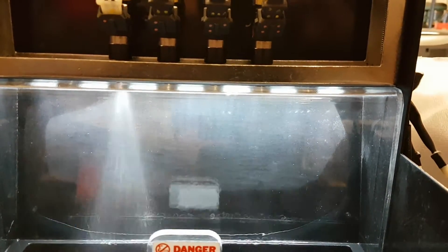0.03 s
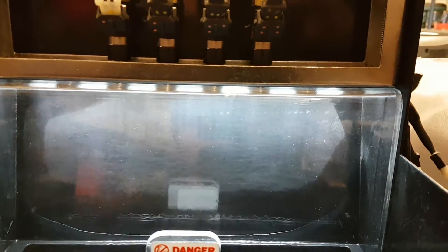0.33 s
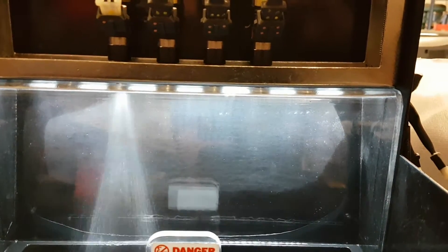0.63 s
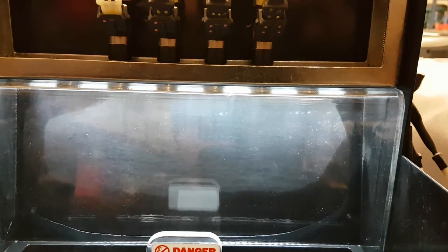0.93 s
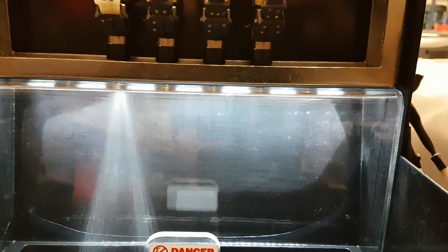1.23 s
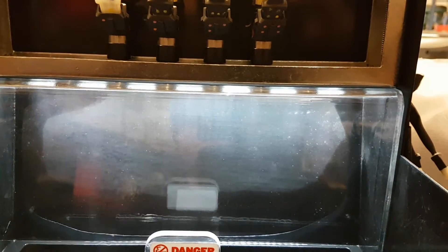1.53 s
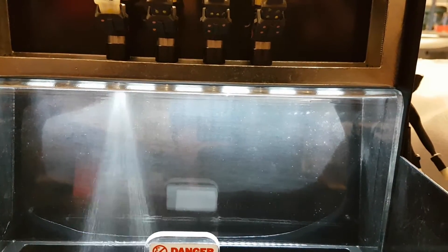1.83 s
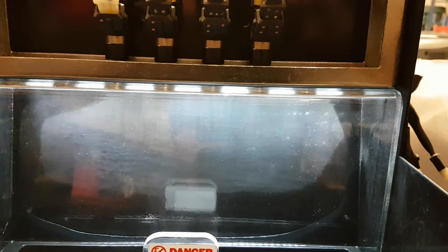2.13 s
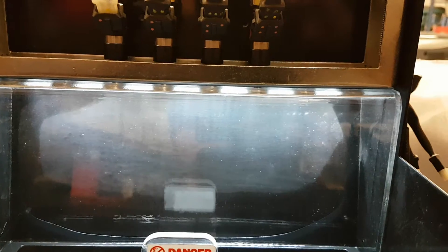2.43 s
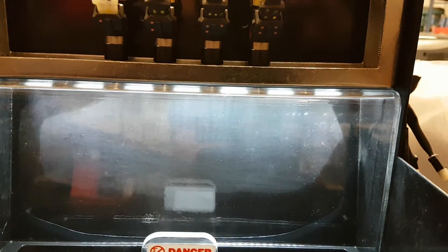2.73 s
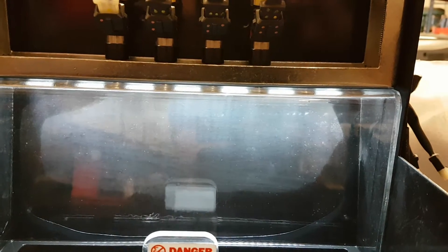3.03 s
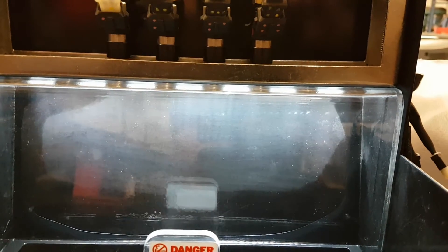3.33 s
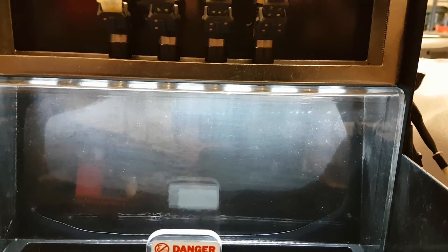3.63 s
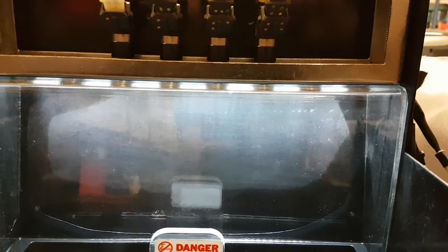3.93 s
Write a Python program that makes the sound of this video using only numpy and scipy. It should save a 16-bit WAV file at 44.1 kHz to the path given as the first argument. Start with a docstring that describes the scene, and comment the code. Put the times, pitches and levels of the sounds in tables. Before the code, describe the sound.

Sharp metallic clicking of fuel injectors firing, with a pump whining and fluid rushing beneath.

```python
"""Fuel injectors on a test bench

Two injectors fire in turn into a spray chamber, the first at 20 and then 5 shots a second, the second
at 5. Each shot is two impacts that set metal ringing: the needle opens, then snaps shut. Beneath, the
pump whines and throbs once per turn, fluid rushes, and a rumble swells on the microphone at the end."""
import sys
import numpy as np
from scipy import signal
from scipy.fft import rfft, irfft
from scipy.io import wavfile
from scipy.ndimage import uniform_filter1d

SR = 44100
rng = np.random.default_rng(int(sys.argv[2]) if len(sys.argv) > 2 else 0)


def put_to_file(sound):
    """Save the sound as 16-bit audio at rate SR, in the file named by the first command-line argument."""
    columns = np.atleast_2d(sound).T  # one column per channel
    safe = np.clip(columns, -1, 1)
    whole_steps = np.round(safe * 32767)
    wavfile.write(sys.argv[1], SR, whole_steps.astype(np.int16))


N = 176400

# runs of shots: start_s, period_s, shot_count, injector_index, needle_open_s, tick_gain_db
SHOT_RUNS = [(.0075, .0502, 7, 0, .0055, 1.3), (.5099, .20075, 8, 0, .0052, -.4),
             (2.1665, .20088, 10, 1, .0053, 0)]
# spectral envelopes of the ticks: frequency_hz, open_left_db, open_right_db, close_left_db, close_right_db
FIRST_COLOUR = [(776, -2, 2, -12, 5), (820, 14, 9, 23, -6.5), (1160, 11, 21, 3, 14), (1460, -6, 0, 6.5, 10),
                (1810, -1, 13, 14, 7), (2000, 2, 13.5, 11, 9), (2790, -6, 3, 12.5, 11.5),
                (3780, -2, -10, -4.5, 7.5), (4120, -3, 7, -0.5, 8), (5830, -13, -7.5, 3, -1),
                (6360, 2.5, 14, -3.5, 4), (7530, -3.5, -1, 4, 7), (9400, -4.5, -15, -3.5, -6),
                (11000, 1.5, -7, 2, -6), (13000, -2, -5, 2.5, -6), (14200, 11, 2, 2, 0),
                (15400, -2, 6, -16, 4)]
SECOND_COLOUR = [(770, -6, 1, 8, -2), (890, -7, 5, 5, 21.5), (1200, -10, 5, 14, 6.5), (1470, 1, 9, 11, 19),
                 (1750, 4, 15, 5, 11), (2080, -4, -1.5, 24, 10.5), (2750, -2, 4, -22, 9),
                 (3420, 5, 2, 14.5, 10.5), (3350, -22, -9, 0, -8), (3760, -11, 5, 8.5, 11.5),
                 (4750, -6, 7, 5.5, 4), (5800, -1, 5.5, 0, -2), (7150, 0, 6, 2.5, 8.5),
                 (9800, -4, -3, -2.5, -8.5), (11500, 2, -17, -1, -18), (13100, 5, 8, 4, 4),
                 (15500, 3, -14, -6, -23)]
# decay and strength of the ticks, a row per injector: open_t60_s, close_t60_s, open_db, close_db
TICK_SHAPES = [(.022, 0.041, 0.3, -1), (.026, 0.046, 0.1, -0.5)]
# modes struck as the needle closes: pitch_hz, left_db, right_db, t60_s
FIRST_CLACK = [(890, -31, -19, .036), (1070, -31, -20, .024), (2050, -27, -12, .022),
               (2600, -34, -20, .018), (3200, -35, -35, .03), (4020, -42, -33, .025),
               (7200, -35, -35, .022), (14200, -34, -34, .018)]
SECOND_CLACK = [(880, -48, -39, .05), (1720, -28, -18, .015), (2160, -24, -11, .012),
                (3270, -39, -42, .025), (3960, -35, -32, .028), (4774, -42, -30, .028),
                (7350, -37, -32, .022), (13400, -34, -35, .018)]
# modes of the spray chamber: pitch_hz, level_db, t60_s
KNOCK_MODES = [(163, -52.5, 0.15), (233.2, -32.5, 0.11), (255, -34.5, 0.046)]
# envelope of the pump's whine: time_s, level_db
WHINE_ENVELOPE = [(0.0, -25), (0.09, -31), (0.13, -24.5), (0.24, -27), (0.42, -24), (0.58, -27.5),
                  (0.8, -24), (0.92, -25.5), (1.27, -23), (1.39, -28), (1.59, -25.5), (1.7, -29),
                  (1.9, -25.5), (2.06, -26.5), (2.12, -23.5), (2.43, -31.5), (2.55, -24), (3.19, -27),
                  (3.34, -23.5), (3.44, -25), (3.54, -22.5), (3.61, -25.5), (3.87, -27), (4.0, -30)]
# sidebands of the whine: shaft_multiple, left_db, right_db
THROB_SIDEBANDS = [(7, -48, -47), (8, -40, -38), (10, -38, -41), (11, -55, -52)]
# other harmonics of the shaft rate: shaft_multiple, left_db, right_db
BUZZ_HARMONICS = [(1, -49, -49), (5, -57, -56), (6, -61, -57), (17, -58, -55), (18, -54, -37),
                  (22, -61, -57), (25, -68, -51), (26, -66, -43), (27, -55, -43), (36, -61, -46),
                  (39, -68, -57), (45, -68, -61)]
# spectral density of the flow noise: frequency_hz, left_db, right_db
RUSH_SPECTRUM = [(25, -95, -86), (40, -82, -78), (56, -63.5, -64), (83.5, -61.5, -61.5), (148, -57.5, -57),
                 (219, -63, -63.5), (360, -73, -75), (605, -61, -64), (740, -77.5, -70.5),
                 (1080, -75.5, -75.5), (1226, -68, -59), (1380, -75.5, -75.5), (1796, -77.5, -65),
                 (1850, -81, -69), (2330, -78, -72), (3300, -86.5, -78.5), (3970, -80.5, -79),
                 (5000, -90, -84), (7400, -87.5, -86), (9600, -90.5, -100), (12900, -88.5, -95.5),
                 (15500, -99, -97)]
# likeness of the flow noise in the two channels: frequency_hz, correlation
RUSH_CORRELATION = [(60, 0.98), (200, 1), (500, 0.54), (1200, 0.13), (4000, 0.099), (14000, 0.036)]
# contour of the flow noise's bass, taken about its mean: time_s, level_db
BASS_CONTOUR = [(0.0, -38.5), (1.35, -37), (1.42, -47), (1.5, -35.5), (1.58, -40), (2.35, -38.5),
                (2.38, -32.5), (2.88, -39), (2.99, -34), (3.04, -37.5), (3.74, -39.5), (3.8, -34)]
# resonances excited by the flow: centre_hz, width_hz, left_db, right_db
PIPE_RESONANCES = [(1206, 23, -58, -50.5), (1766, 130, -56, -44.5), (2376, 120, -74, -62.5),
                   (2714, 120, -55, -51.5), (4163, 170, -58, -54.5)]
# envelope of the rumble on the microphone: time_s, level_db
RUMBLE_ENVELOPE = [(3.86, -70), (3.885, -28), (3.95, -24.5), (4.0, -29)]

IMPACT_SAMPLES, ATTACK_S = 8192, .0006
IMPACT_TIME_S, IMPACT_HZ = np.arange(IMPACT_SAMPLES) / SR, np.fft.rfftfreq(IMPACT_SAMPLES, 1 / SR)
SHOT_SPREAD_DB, CLOSE_JITTER_S = .5, .0001
LOW_CUT_HZ, TREBLE_EDGE_HZ, TREBLE_T60_SHARE = 700, 12000, .57
ROOM_DELAY_S, ROOM_BUILD_S, ROOM_T60_S, ROOM_DB = .011, .008, .12, -15.5
SHAFT_HZ, SHAFT_WANDER_HZ, STROKES_PER_TURN = 63.19, .05, 9
THROB_TRIM_DB, THROB_WAVER_DB = -.46, 1.5
BUZZ_TRIM_DB, BUZZ_WAVER_DB, PHASE_WANDER_RAD = -1.5, 2, .2
RUSH_TRIM_DB, BASS_EDGE_HZ, HISS_PULSE_DEPTH, HISS_FLICKER_DB = -.37, 290, .24, .5
FLUTTER_DB, RUMBLE_BAND_HZ = 3, [41.3, 98]


def injectors():
    """Impact excitation: the needle ticks on opening, then ticks on closing with a clack and a knock."""
    out = np.zeros((2, N))
    colours = [at_hz(table, IMPACT_HZ) for table in (FIRST_COLOUR, SECOND_COLOUR)]
    bodies = rng.standard_normal((2, 2, 2, IMPACT_SAMPLES))  # injector, open or close, channel, sample
    for start_s, period_s, shot_count, which, open_s, run_db in SHOT_RUNS:
        open_t60, close_t60, open_db, close_db = TICK_SHAPES[which]
        for shot_s in start_s + period_s * np.arange(shot_count):
            gain = from_db(SHOT_SPREAD_DB * rng.normal())
            opening = needle_tick(bodies[which, 0], colours[which][:2] + open_db + run_db, open_t60)
            closing = needle_tick(bodies[which, 1], colours[which][2:] + close_db + run_db, close_t60)
            closing += needle_clack((FIRST_CLACK, SECOND_CLACK)[which]) + chamber_knock()
            add(out, shot_s, gain * opening)
            add(out, shot_s + open_s + CLOSE_JITTER_S * rng.normal(), gain * closing)
    return out


def needle_tick(body, colour_db, t60):
    """Dense modes ring like decaying noise, a little different at each impact; the treble damps first."""
    t, hz = IMPACT_TIME_S, IMPACT_HZ
    struck = (body + .4 * rng.standard_normal(body.shape)) * np.minimum(t / ATTACK_S, 1)
    slow = rfft(struck * from_db(-60 * t / t60))
    fast = rfft(struck * from_db(-60 * t / (t60 * TREBLE_T60_SHARE)))
    burst = fast + (slow - fast) / (1 + (hz / TREBLE_EDGE_HZ) ** 6)
    # dividing by the broad outline keeps the fine peaks and lets the colour set the envelope
    outline = np.sqrt(uniform_filter1d(abs(burst) ** 2, size=65))
    low_cut = (hz + 10) ** 3 / ((hz + 10) ** 3 + LOW_CUT_HZ ** 3)
    return irfft(burst * minimum_phase(from_db(colour_db) * low_cut / outline))


def needle_clack(modes):
    """Free vibration: the closing needle strikes modes that decay as damped sinusoids."""
    t, out = IMPACT_TIME_S, 0
    for k, (hz, left, right, t60) in enumerate(modes):
        envelope = from_db(stereo(left, right) + rng.normal() - 60 * t / t60)
        out += envelope * np.sin(2 * np.pi * hz * t) * (-1) ** k
    return np.minimum(t / ATTACK_S, 1) * out


def chamber_knock():
    """Impulse response: a puff of spray strikes the low modes of the chamber."""
    t = IMPACT_TIME_S
    return sum(from_db(db + rng.normal() - 60 * t / t60) * np.sin(2 * np.pi * hz * t)
               for hz, db, t60 in KNOCK_MODES)


def room(sound):
    """Reverberation: reflections arrive after a short gap, build up and decay exponentially."""
    t = np.arange(SR // 2) / SR
    envelope = np.clip((t - ROOM_DELAY_S) / ROOM_BUILD_S, 0, 1) * from_db(-60 * t / ROOM_T60_S)
    tail = rng.standard_normal((2, len(t))) * envelope * from_db(ROOM_DB) / np.sqrt(np.sum(envelope ** 2))
    return signal.fftconvolve(sound, tail, axes=1)[:, :N]


def pump(shaft_rad):
    """Periodic forcing: the strokes whine, sidebands beat with them once a turn, other harmonics buzz."""
    whine_db = in_time(WHINE_ENVELOPE) + stereo(1.5, -.5)
    out = from_db(whine_db) * np.cos(STROKES_PER_TURN * shaft_rad)
    for multiple, left, right in THROB_SIDEBANDS:
        level_db = stereo(left, right) + THROB_TRIM_DB + THROB_WAVER_DB * drift(1.74)
        out -= from_db(level_db) * np.cos(multiple * shaft_rad + PHASE_WANDER_RAD * drift(1.8))
    for multiple, left, right in BUZZ_HARMONICS:
        level_db = stereo(left, right) + BUZZ_TRIM_DB + BUZZ_WAVER_DB * drift(4.2)
        phase = multiple * shaft_rad + rng.uniform(0, 2 * np.pi) + PHASE_WANDER_RAD * drift(16)
        out += from_db(level_db) * np.cos(phase)
    return np.sqrt(2) * out


def fluid_rush(shaft_rad):
    """Amplitude-modulated flow noise: the bass heaves and the hiss pulses with the shaft."""
    hz = np.fft.rfftfreq(N, 1 / SR)
    mid, side = rfft(rng.standard_normal((2, N)))
    correlation = at_hz(RUSH_CORRELATION, hz)
    white = np.sqrt(1 + correlation) * mid + np.sqrt(1 - correlation) * side * stereo(1, -1)
    spectrum = white * from_db(at_hz(RUSH_SPECTRUM, hz) + RUSH_TRIM_DB) * np.sqrt(SR) / 2
    low_pass = 1 / (1 + (hz / BASS_EDGE_HZ) ** 6)
    bass_db = in_time(BASS_CONTOUR)
    bass = irfft(spectrum * low_pass) * from_db(bass_db - bass_db.mean())
    pulse = 1 + HISS_PULSE_DEPTH * np.cos(shaft_rad)
    hiss = irfft(spectrum * (1 - low_pass)) * pulse * from_db(HISS_FLICKER_DB * drift(5.1))
    return bass + hiss


def pipe_flutter():
    """Resonance: flow through the pipes excites narrow bands, each swelling and fading on its own."""
    out = 0
    for hz, width, left, right in PIPE_RESONANCES:
        band = signal.butter(1, [hz - width / 2, hz + width / 2], "band", fs=SR, output="sos")
        noise = unit_rms(signal.sosfilt(np.vstack([band, band]), rng.standard_normal((2, N))))
        out += noise * from_db(stereo(left, right) + FLUTTER_DB * drift(12))
    return out


def microphone_rumble():
    """Narrow-band noise fluctuates in amplitude, so this low rumble sounds lumpy."""
    band = signal.butter(3, RUMBLE_BAND_HZ, "band", fs=SR, output="sos")
    return from_db(in_time(RUMBLE_ENVELOPE)) * unit_rms(signal.sosfilt(band, rng.standard_normal(N)))


def from_db(db):
    """Decibels to amplitude ratio."""
    return 10 ** (np.asarray(db) / 20)


def stereo(left, right):
    """A column of one value per channel."""
    return np.array([[left], [right]])


def unit_rms(x):
    """Normalisation to unit mean power."""
    return x / np.sqrt(np.mean(x ** 2) + 1e-20)


def in_time(rows):
    """Linear interpolation of an envelope at every sample."""
    return np.interp(np.arange(N) / SR, *np.transpose(rows))


def at_hz(rows, hz):
    """Interpolation of each column of a spectrum in log frequency."""
    points, *columns = np.transpose(rows)
    return np.array([np.interp(np.log(hz + 1), np.log(points), column) for column in columns])


def drift(corner_hz):
    """Low-passed noise: a slow random movement of unit rms."""
    hop, settle = 40, 2000
    pole = np.exp(-2 * np.pi * corner_hz * hop / SR)
    noise = rng.standard_normal(N // hop + settle + 2)
    slow = signal.lfilter([1], [1, -2 * pole, pole * pole], noise)[settle:]
    return np.interp(np.arange(N) / hop, np.arange(len(slow)), unit_rms(slow))


def minimum_phase(gain):
    """Folding the cepstrum gives a causal frequency response with these gains."""
    cepstrum = irfft(np.log(gain + 1e-9))
    half = cepstrum.shape[-1] // 2
    cepstrum[..., 1:half] *= 2
    cepstrum[..., half + 1:] = 0
    return np.exp(rfft(cepstrum))


def add(out, start_s, sound):
    """Superpose a sound from a given time on."""
    i = int(start_s * SR)
    part = sound[..., :max(out.shape[-1] - i, 0)]
    out[..., i:i + part.shape[-1]] += part


def scene():
    """Superposition: the shots and their reflections over the pump, the flow and the rumble."""
    shaft_rad = 2 * np.pi * np.cumsum(SHAFT_HZ + SHAFT_WANDER_HZ * drift(2)) / SR
    shots = injectors()
    return (shots + room(shots) + pump(shaft_rad) + fluid_rush(shaft_rad)
            + pipe_flutter() + microphone_rumble())


def record(dry, cutoff_hz=15900):
    """Band limiting: a steep low-pass filter removes the highest treble."""
    return signal.sosfilt(signal.ellip(10, .2, 80, cutoff_hz, fs=SR, output="sos"), dry)


dry = scene()
out = record(dry)
put_to_file(out)
```